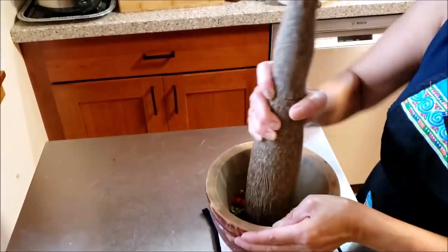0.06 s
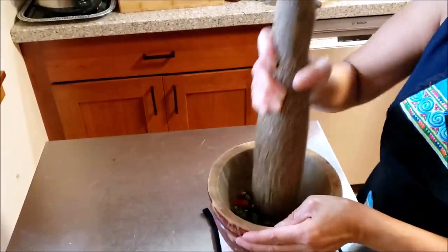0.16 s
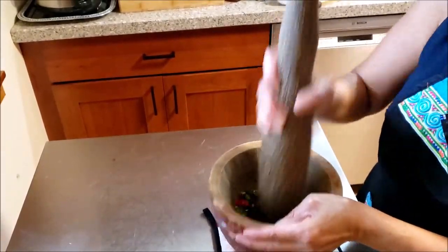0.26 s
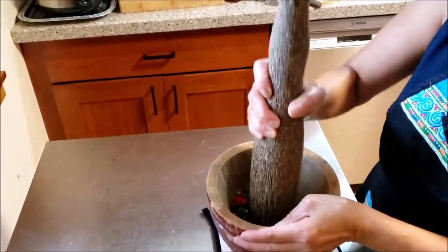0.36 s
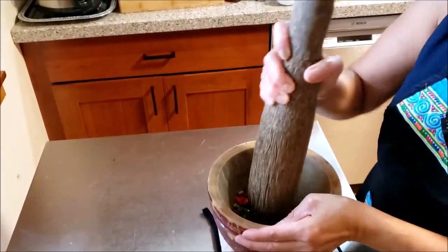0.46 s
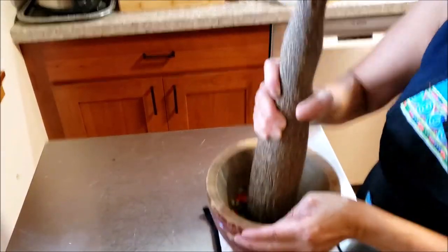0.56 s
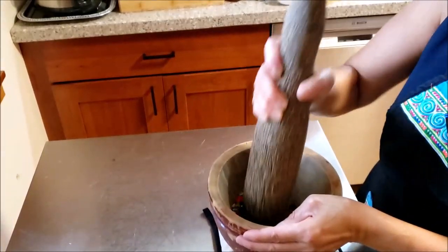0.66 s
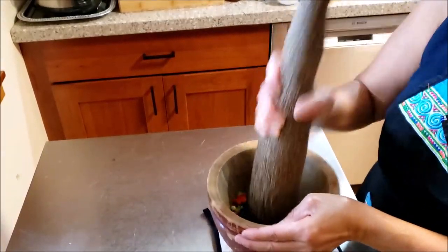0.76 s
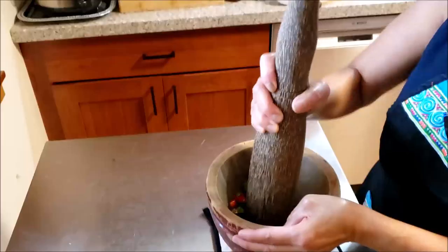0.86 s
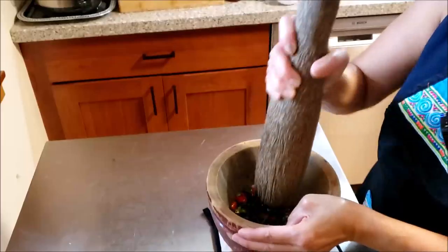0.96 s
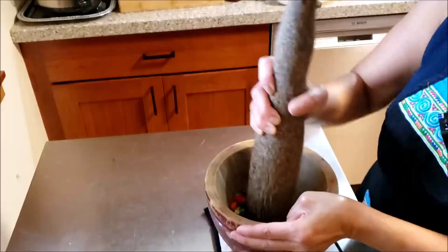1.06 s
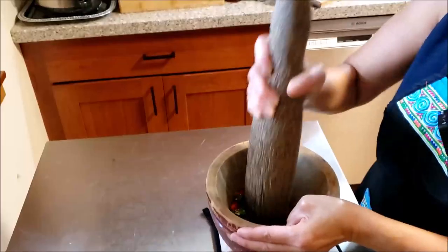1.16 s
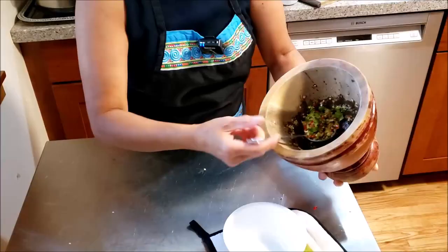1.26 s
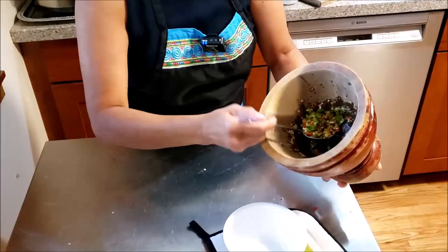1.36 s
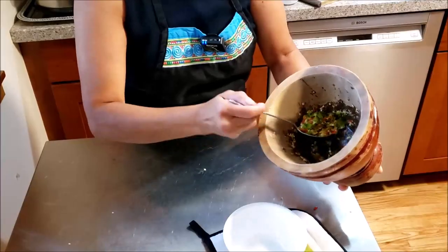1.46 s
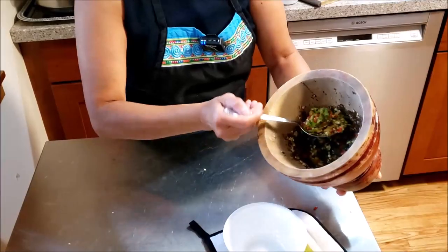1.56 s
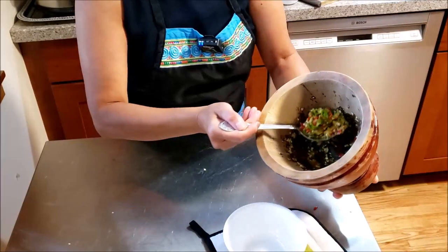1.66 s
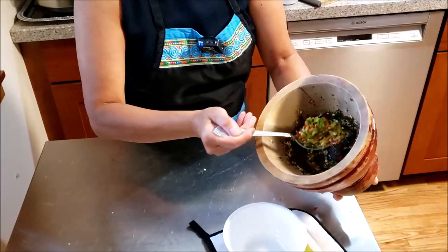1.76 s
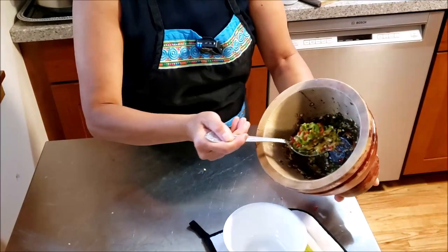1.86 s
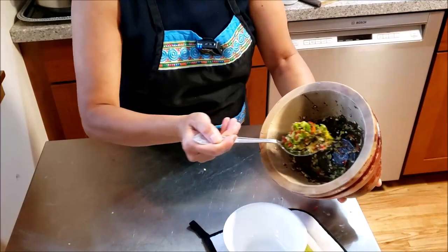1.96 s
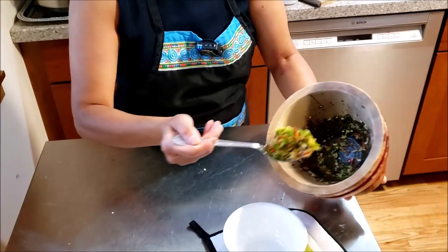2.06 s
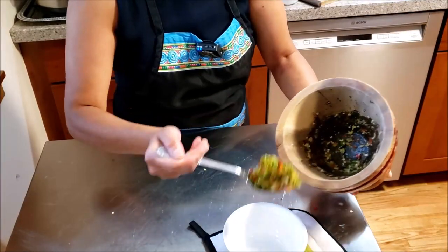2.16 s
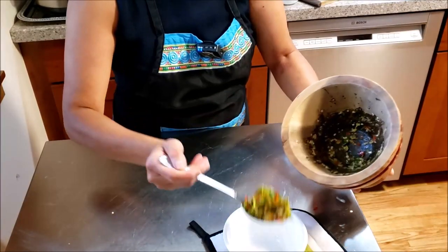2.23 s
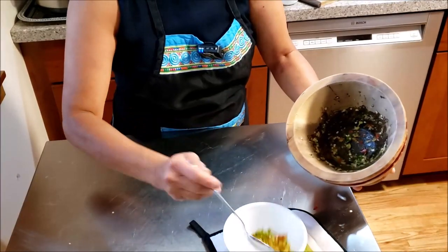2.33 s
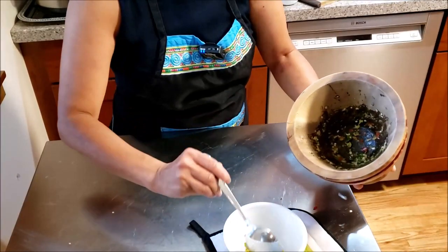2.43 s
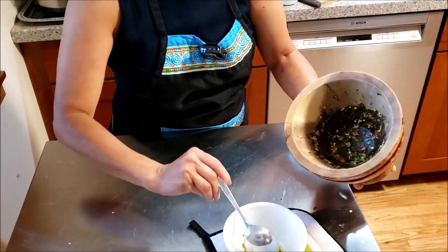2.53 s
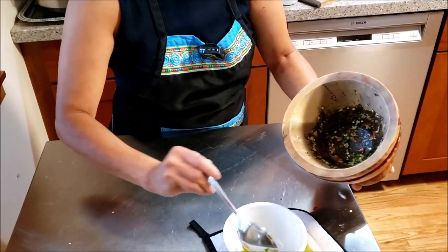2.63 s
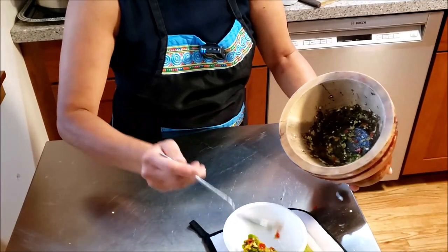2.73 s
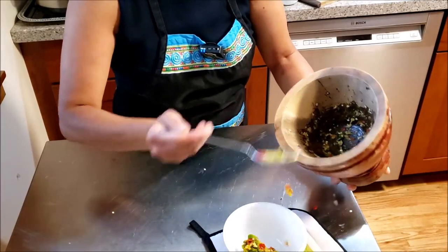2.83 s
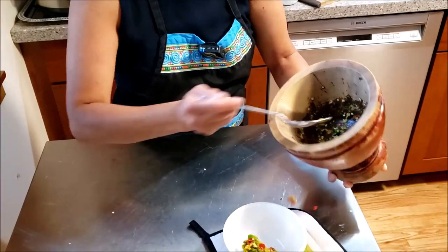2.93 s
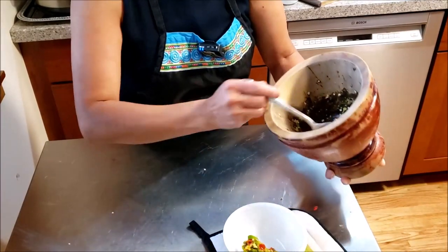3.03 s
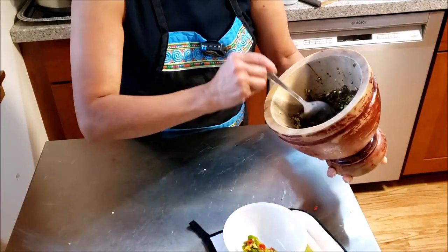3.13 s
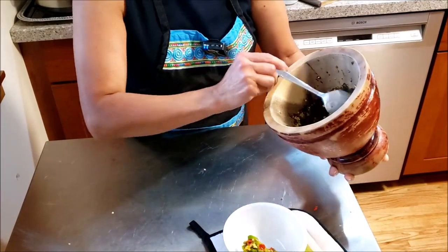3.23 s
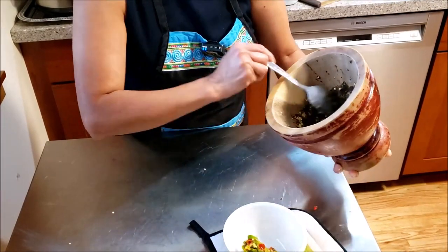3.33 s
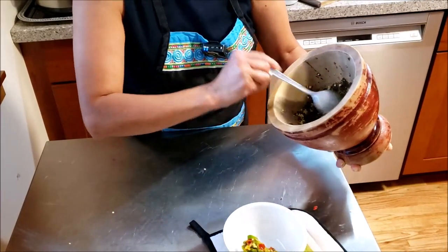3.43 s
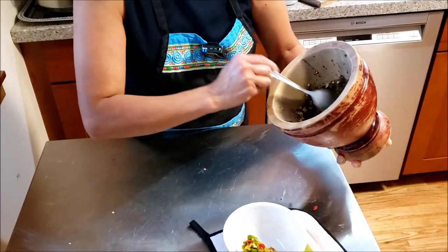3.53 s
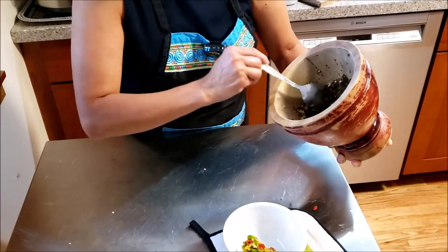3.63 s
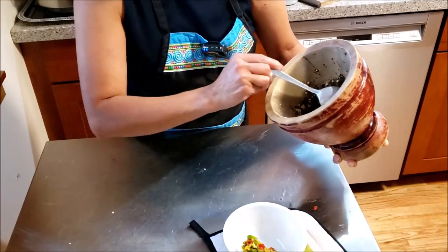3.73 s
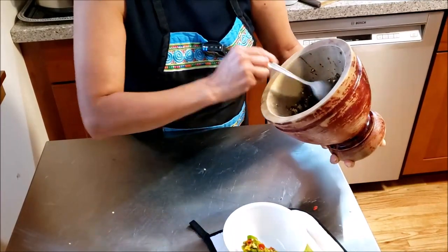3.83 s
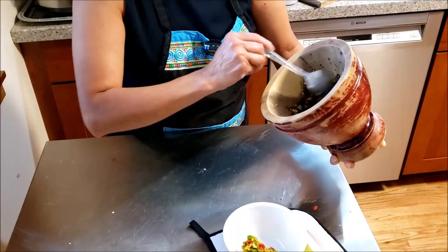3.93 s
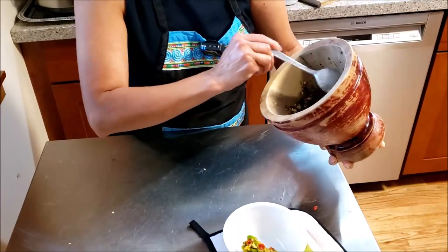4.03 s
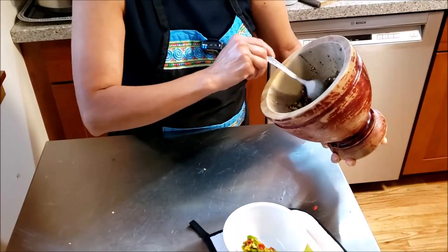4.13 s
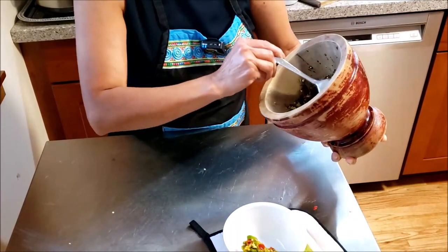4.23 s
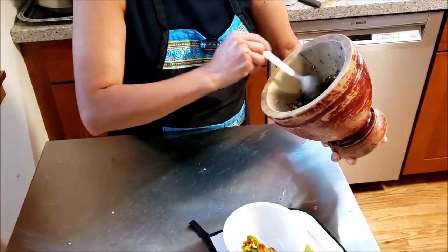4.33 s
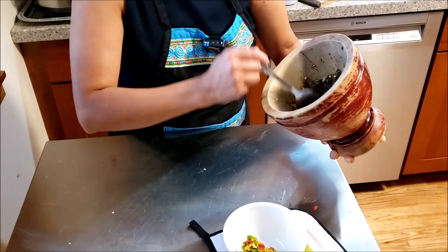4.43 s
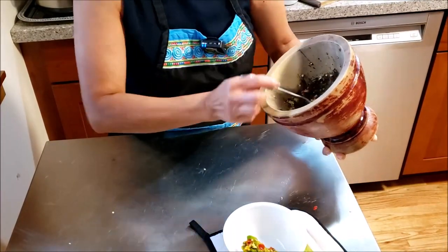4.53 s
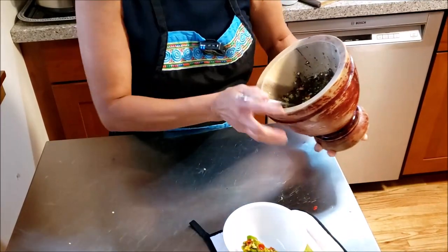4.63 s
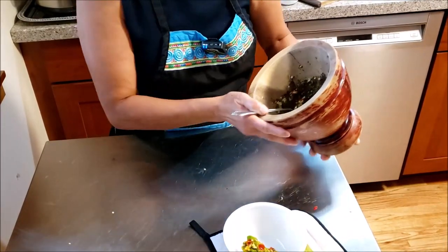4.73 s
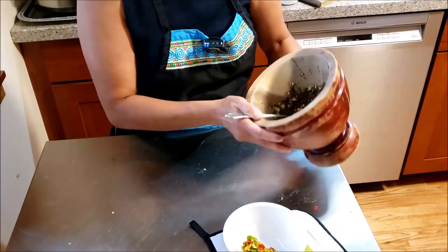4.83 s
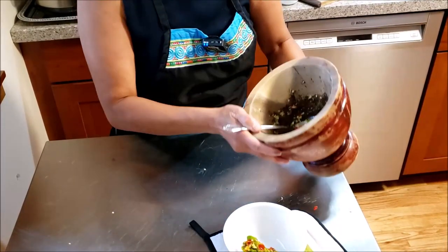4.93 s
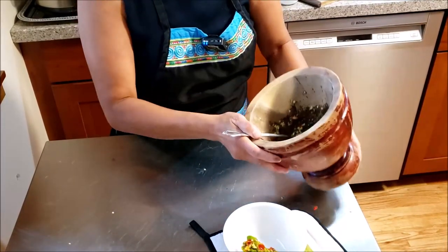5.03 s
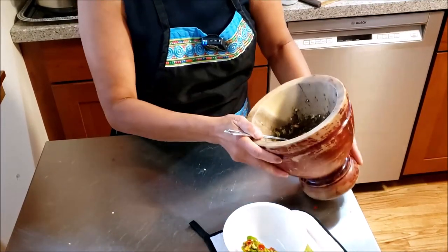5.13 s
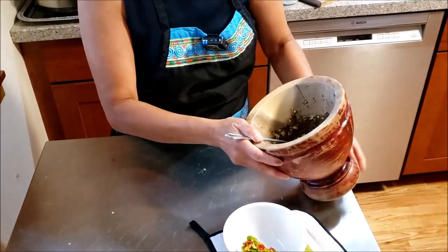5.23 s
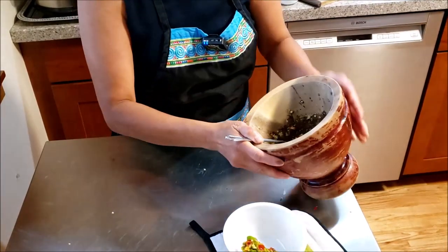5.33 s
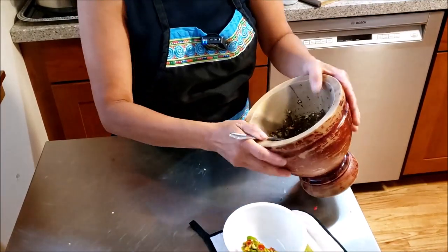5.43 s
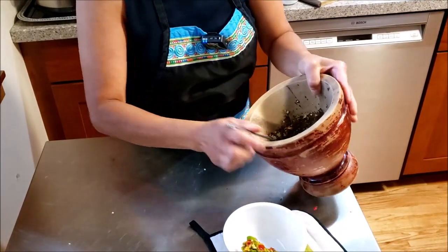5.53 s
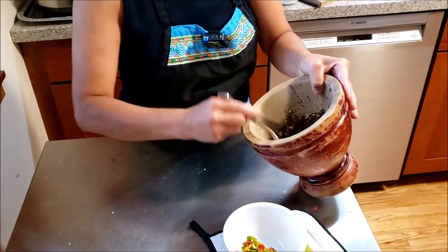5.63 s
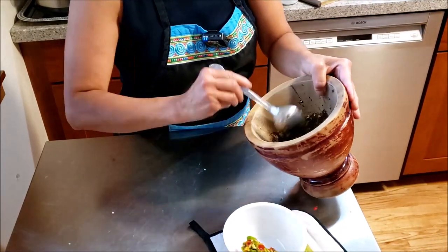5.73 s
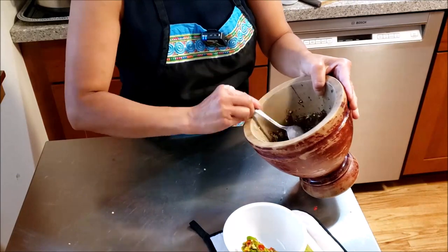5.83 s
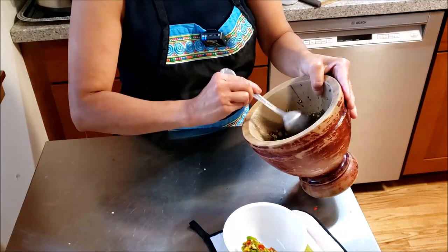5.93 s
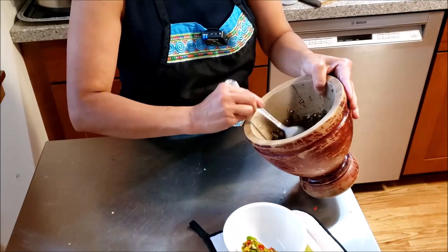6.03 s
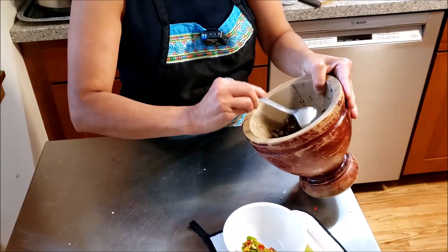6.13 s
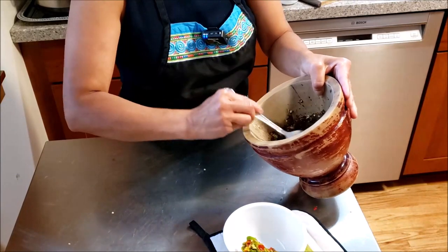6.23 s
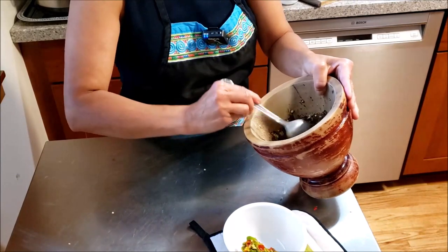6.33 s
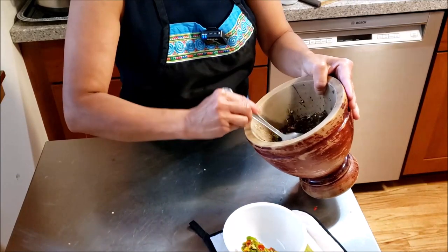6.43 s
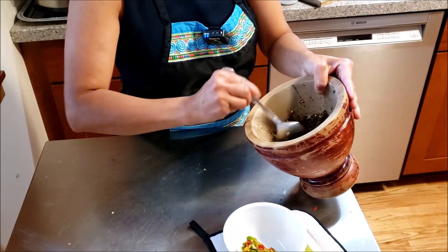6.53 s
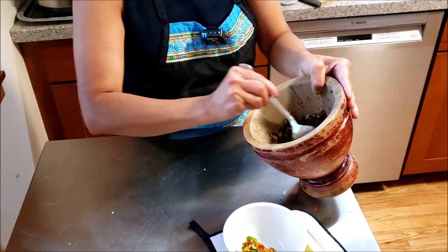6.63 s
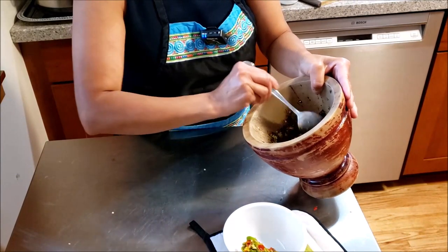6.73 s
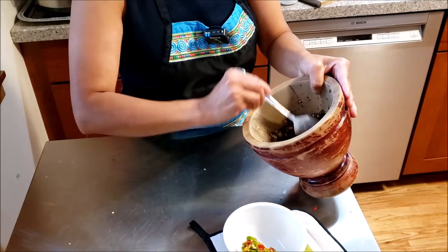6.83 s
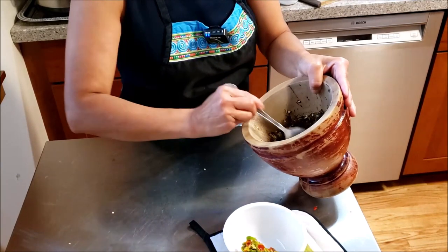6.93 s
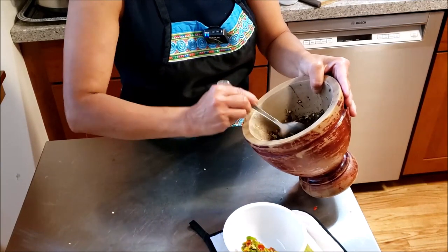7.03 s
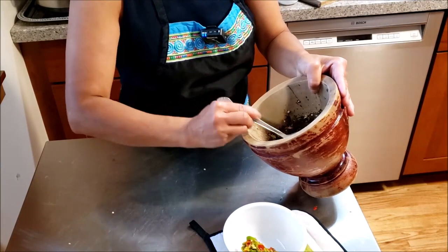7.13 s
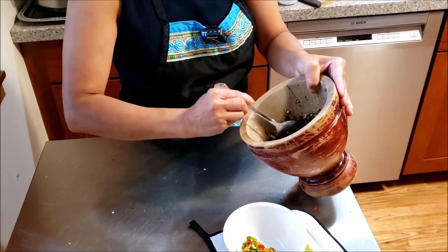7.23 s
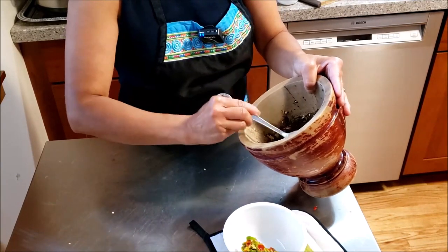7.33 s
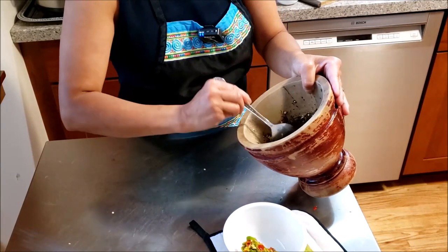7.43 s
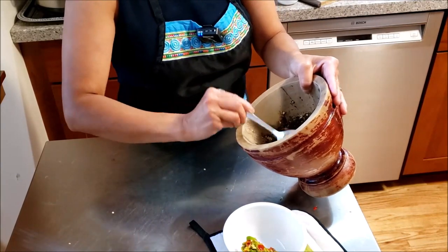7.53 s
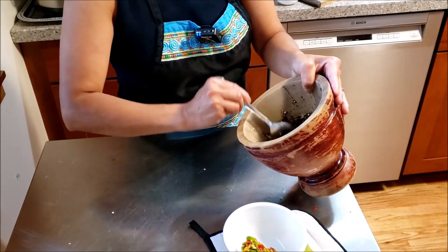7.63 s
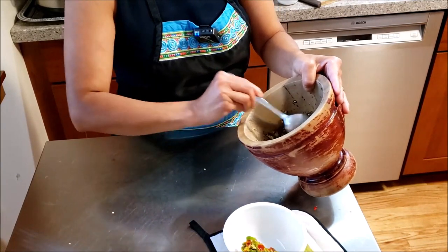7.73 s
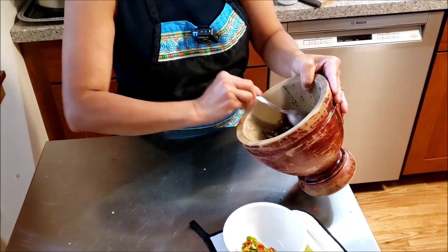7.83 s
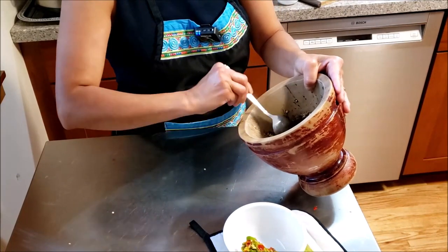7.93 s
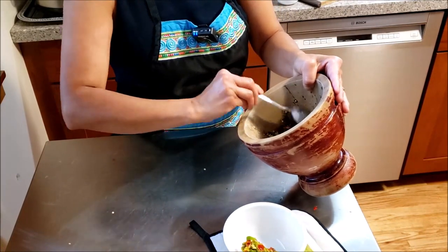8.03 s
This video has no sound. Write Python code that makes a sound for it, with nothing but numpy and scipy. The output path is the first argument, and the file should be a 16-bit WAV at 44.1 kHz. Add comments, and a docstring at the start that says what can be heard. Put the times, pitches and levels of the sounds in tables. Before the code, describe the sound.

A wooden pestle thuds five times into wet chillies, then a metal spoon taps and scrapes inside the clay mortar in a small kitchen.

```python
"""Chillies in a clay mortar

A small kitchen, one microphone near a steel table. A wooden pestle pounds wet chillies in a deep clay
mortar, five blows. The mortar is lifted, scraped out with a metal spoon, set down with a thud and
scraped again: taps on the wall and short drags through the paste. The room rings after every contact,
and the recorder's limiter flattens the hardest ones."""
import sys
import numpy as np
from scipy import signal
from scipy.fft import rfft, irfft, next_fast_len
from scipy.io import wavfile
from scipy.ndimage import uniform_filter1d, minimum_filter1d, map_coordinates

SR = 44100
rng = np.random.default_rng(int(sys.argv[2]) if len(sys.argv) > 2 else 0)


def unload_wav(signal):
    """Save mono or channel-first audio to the path in sys.argv[1] as 16-bit WAV at rate SR, clipped to [-1, 1]."""
    wavfile.write(
        sys.argv[1],
        SR,
        np.round(np.clip(np.atleast_2d(signal).T, -1, 1) * 32767).astype(np.int16),
    )


N = 355887

# the kitchen's decay: (frequency [Hz], t60 before stretching [s])
KITCHEN_DECAY = [(80, 0.55), (250, 0.71), (700, 0.84), (1500, 0.94), (4000, 0.68), (8000, 0.54),
                 (15000, 0.11)]
# spectral shapes: (frequency [Hz], relative level [dB])
WALL_COLOUR = [(60, 5), (300, 3.5), (800, 1), (1500, -2.5), (4000, -5), (8000, 2), (15000, 8.5)]  # what the walls send back to the microphone
ROOM_TONE = [(25, -51), (70, 10), (170, 0), (350, -4.5), (900, -11.5), (2000, -23.5), (7700, -25.5),
             (16000, -37.5)]
HISS_SPECTRUM = [(1500, -19), (4500, -8.5), (7500, -2), (10000, -12.5), (16000, -36)]
SKIN_SPECTRUM = [(300, -16), (2200, -1), (3200, 5.5), (5000, 0.5), (8000, -8), (16000, -22)]
CLOTH_SPECTRUM = [(200, -8.5), (400, 5), (1300, -8.5), (2200, -12.5), (8000, -17), (16000, -42)]
CRUSH_SPECTRUM = [(500, -45), (1200, 8), (2000, 7.5), (4200, 8.5), (6500, 7), (10000, -5), (16000, -14)]  # chillies under the pestle; also the spoon's tick
WASH_SPECTRUM = [(500, -17), (1200, 10.5), (2000, 0.5), (4200, 5), (7500, -4), (10000, -14.5), (16000, -30)]  # the crush, diffused in the room

# resonances: (frequency [Hz], bandwidth [Hz], relative level [dB])
DISH_MODES = [(380, 340, -3), (1060, 160, 5), (4000, 2100, -6.5)]
FOOT_MODES = [(84.6, 20.6, 10), (274, 31, 3.5), (348, 25, -0.5), (427, 54, -3.5), (564, 72, -2.5),
              (725, 33, -6.5), (830, 96, -12.5), (1310, 320, -14.5)]  # the mortar's foot on the table
PASTE_MODES = [(5760, 1100, -7), (7160, 82, 2), (8150, 130, 6.5), (9100, 1500, -10.5), (11400, 350, -0.5),
               (13600, 450, -4), (15200, 700, -9)]  # wet squeak
SPOON_MODES = [(1450, 220, -1), (1810, 116, 0.5), (2200, 194, -9), (2596, 115, -5.5), (3057, 106, -3),
               (3620, 228, -5), (4450, 117, -6), (5010, 235, -5), (6660, 220, -18), (7260, 99, -16),
               (9000, 180, -22), (11900, 510, -49)]
HOLLOW_MODES = [(131, 130, -8), (252.6, 39, -1.5), (345, 61, -3.5), (459, 100, -11.5), (586, 86, -9),
                (705.6, 41.5, -2), (843.5, 43.3, -3), (1154, 540, -19.5)]  # the mortar's cavity
KNOCK_MODES = [(490, 170, -14.5), (612, 26, -7.5), (700, 66, -11), (762, 22, -8), (794, 42, -5.5),
               (964, 210, -15), (1136, 47, -13)]  # its bare bottom
BOOM_MODES = [(246.2, 18.4, 1), (270.5, 14.7, 7.5), (326.5, 38, -4), (427, 214, -6)]  # the table top's ring
THUMP_MODES = [(92.2, 24, -4.5), (124.2, 27, 0.5), (138, 24.6, -0.5)]  # the table's deep swing

# swells of noise: (middle [s], length [s], level [dB])
HAND_RUBS = [(1.57, 0.18, -54.5), (4.85, 0.1, -43.5), (5.15, 0.59, -51.5), (5.54, 0.28, -49)]  # hands on clay
APRON_RUSTLES = [(2.97, 0.4, -47.5)]  # the arm swings back to the mortar
HIGH_HISSES = [(2.97, 0.25, -54), (6.56, 0.47, -43.5)]
# soft low bumps while the mortar is held up: (time [s], relative level [dB])
LOW_BUMPS = [(1.593, -29), (1.643, -31), (1.754, -27.5), (1.782, -32.5), (1.822, -34.5), (1.864, -32.5),
             (1.908, -38.5)]
# the mortar's foot lands and rocks on the table: (time [s], level [dB])
FOOT_CONTACTS = [(5.175, -12.5), (5.183, -19), (5.200, -31), (5.236, -25), (5.258, -24)]
# the spoon drags on the wall: (time [s], length [s], hollow level [dB], steel level [dB], steel centre [Hz])
SPOON_DRAGS = [(3.105, 0.018, -25, -27, 2950), (3.331, 0.063, -24.5, -36.5, 2730),
               (3.597, 0.045, -35, -34.5, 1950), (3.832, 0.072, -25, -37, 2720),
               (4.074, 0.04, -23.5, -31, 3500), (4.31, 0.088, -28, -35, 2570),
               (4.521, 0.031, -38, -37, 2860), (4.723, 0.029, -33, -37, 2120),
               (6.212, 0.12, -31.5, -39, 3180), (6.465, 0.032, -29, -31, 3680),
               (6.713, 0.067, -29.5, -33.5, 3540), (6.978, 0.051, -29, -36, 2640),
               (7.166, 0.077, -29, -38.5, 2730), (7.403, 0.024, -25, -33.5, 2830),
               (7.618, 0.058, -33.5, -38, 2700), (7.882, 0.064, -28.5, -36, 2250)]
# the spoon strikes the wall: (time [s], hollow level [dB], steel level [dB], steel centre [Hz])
SPOON_TAPS = [(3.082, -20, -31, 2400), (3.152, -24, -33.5, 2730), (3.286, -28.5, -42.5, 2850),
              (3.33, -20.5, -28.5, 2830), (3.378, -37.5, -28.5, 2700), (3.528, -22, -25.5, 3050),
              (3.596, -19, -27.5, 2160), (3.794, -31.5, -30.5, 3360), (3.941, -46, -28.5, 2460),
              (4.043, -30.5, -37.5, 2440), (4.145, -28.5, -36, 1970), (4.276, -26, -23.5, 3240),
              (4.391, -52, -28, 2450), (4.544, -51, -47, 4430), (4.72, -28, -27.5, 1900),
              (4.757, -34, -33, 2840), (5.267, -55, -39.5, 2930), (5.466, -35, -21.5, 3440),
              (5.623, -35, -43, 2540), (5.891, -16.5, -15, 2800), (6.047, -17.5, -21.5, 2470),
              (6.205, -35.5, -30, 4000), (6.261, -30.5, -31, 3860), (6.442, -25.5, -24.5, 3240),
              (6.664, -29.5, -26.5, 2200), (6.926, -34, -24.5, 3400), (6.966, -24.5, -66, 2560),
              (7.381, -28, -41, 2880), (7.575, -26.5, -27, 3200), (7.626, -24, -34, 3870),
              (7.845, -21, -32, 2380)]
# the pestle lands: (time [s], weight [dB], relative knock level [dB], delay until the paste gives [s])
PESTLE_BLOWS = [(0.052, -18.5, -14.5, 0.012), (0.315, -24, -18.5, 0.022), (0.587, -12, -22, 0.034),
                (0.853, -11.5, -16.5, 0.025), (1.122, -21.5, -42, 0.015)]

DISH_S, DISH_DB = 2.573, -44.5
HOLLOW_HELD_HZ, HOLLOW_STANDING_HZ = 717, 600  # the hollow answers lower on the table
PASTE_HELD_DB, PASTE_STANDING_DB = -12, -16.5  # relative to the steel; less paste on the second pass
CHATTER_S, CHATTER_S_PER_POWER = 0.0075, 3.42  # shortest t60; a harder tap chatters longer
BOOM_DB, BOOM_GROWS = 2, 1.38  # level at a weight of 0 dB; dB gained per dB of weight
CRUSH_DB, CRUSH_GROWS = -21, 0.44  # soft paste hardly gets louder under a heavier blow
WASH_DB, WASH_T60_S = -2.5, 0.8  # level relative to the crush
POUNDING_END_S, TOP_HZ = 1.318, 15700
SIZE = 16384  # samples in one contact's sound
T = np.arange(SIZE) / SR
HZ = np.fft.rfftfreq(SIZE, 1 / SR)


def amp(db):
    """Decibels to gain."""
    return 10 ** (np.asarray(db) / 20)


def along(points, hz):
    """Interpolate (frequency [Hz], value) points on a log frequency axis."""
    freqs, values = np.transpose(points)
    return np.interp(np.log(hz + 1), np.log(freqs + 1), values)


def level(x, db, seconds=1 / 50):
    """Scale x to the energy of a sound that holds db for so many seconds."""
    return x * amp(db) * np.sqrt(seconds * SR / (np.sum(x ** 2) + 1e-20))


def add(track, s, x):
    """Mix x into the track at time s."""
    part = track[max(round(s * SR), 0):][:len(x)]
    part += x[:len(part)]


def noise(spectrum, size):
    """Coloured noise of rms 1."""
    padded = next_fast_len(size)
    colour = amp(along(spectrum, np.fft.rfftfreq(padded, 1 / SR)))
    x = irfft(rfft(rng.standard_normal(padded)) * colour, padded)[:size]
    return x / np.std(x)


def grains(rate, spread_db):
    """Random slips of uneven size, about rate a second."""
    slips = (rng.random(SIZE) < rate / SR) * rng.standard_normal(SIZE)
    return slips * amp(spread_db * rng.standard_normal(SIZE))


def swells(rows):
    """A gain with one bell-shaped swell per row."""
    t = np.arange(N) / SR
    return sum(amp(db) * np.exp(-(2 * (t - s) / length) ** 2) for s, length, db in rows)


def contact(t60, rattle):
    """One sharp push and a dying chatter, flattened to drive all frequencies about evenly."""
    chatter = grains(8000, 0.35) * amp(-60 * T / t60)
    spectrum = rfft((T == 0) + rattle * chatter / (np.linalg.norm(chatter) + 1e-9))
    power = uniform_filter1d(np.abs(spectrum) ** 2, size=161)
    return irfft(spectrum / np.sqrt(np.abs(power) + 1e-9))


def resonate(force, modes, hard_hz, centre_hz=None, octaves=1.0, scatter_db=3.0):
    """A force rings the modes, dulled above hard_hz; the place of contact favours centre_hz."""
    hz, width, db = np.transpose(modes)[:, :, None]
    polarity = (-1) ** np.arange(len(modes))[:, None]
    gain = polarity * amp(db + scatter_db * rng.standard_normal(db.shape))
    if centre_hz:
        gain = gain * (0.14 + 1 / (1 + (np.log2(hz / centre_hz) / octaves) ** 2))
    response = np.sum(gain * 1j * HZ * width / (hz ** 2 - HZ ** 2 + 1j * HZ * width), axis=0)
    ring = irfft(rfft(force) * response / (1 + 1j * HZ / hard_hz) ** 2)
    return ring * (1 - T / T[-1])


def kitchen(x, wet_db, stretch=0.55):
    """The microphone hears the direct sound, then a diffuse tail off the walls, drawn anew each call."""
    hz, t, bands = signal.stft(rng.standard_normal(SR * 3 // 5), SR, nperseg=256)
    decay = amp(-60 * t / (stretch * along(KITCHEN_DECAY, hz))[:, None])
    tail = signal.istft(bands * decay * amp(along(WALL_COLOUR, hz))[:, None], SR, nperseg=256)[1]
    tail *= 1 - np.exp(-(np.arange(len(tail)) / SR / 0.0041) ** 2)  # reflections build up
    response = amp(wet_db) * tail / np.sqrt(SR * np.mean(np.sum(decay ** 2, axis=1)) * t[1])
    response[0] += 1  # direct path
    return signal.fftconvolve(x, response)


def background():
    """Room tone, with uneven rubbing of hands and apron and a soft high hiss that comes and goes."""
    unrest = map_coordinates(rng.standard_normal(400), [np.arange(N) / SR * 40])
    hands = swells(HAND_RUBS) * noise(SKIN_SPECTRUM, N)
    apron = swells(APRON_RUSTLES) * noise(CLOTH_SPECTRUM, N)
    hiss = swells(HIGH_HISSES) * noise(HISS_SPECTRUM, N)
    return amp(2.8 * unrest) * (hands + apron) + hiss + amp(-53.5) * noise(ROOM_TONE, N)


def bumps():
    """Each low bump is a few slow swings under a soft swell, with a weak overtone."""
    out = np.zeros(N)
    phase = 2 * np.pi * 110 * T
    swing = (np.sin(phase) + 0.12 * np.sin(2 * phase)) * np.exp(-((T - .015) / 0.0067) ** 2)
    for s, db in LOW_BUMPS:
        add(out, s, level(swing, db + 2.5))
    return kitchen(out, wet_db=-6.5)[:N]


def spoonful():
    """The loaded spoon gives a dish one dull knock; it sounds off-mic, with plenty of room."""
    out = np.zeros(N)
    knock = level(resonate(contact(0.02, 1.0), DISH_MODES, hard_hz=5000), DISH_DB)
    add(out, DISH_S, kitchen(knock, wet_db=0.0, stretch=0.7))
    return out


def landing():
    """The mortar's heavy foot meets the table dully and rattles to rest."""
    out = np.zeros(N)
    for s, db in FOOT_CONTACTS:
        add(out, s, level(resonate(contact(0.071, 0.75), FOOT_MODES, hard_hz=1900), db))
    return kitchen(out, wet_db=-3.5)[:N]


def standing(s):
    """Whether the mortar is back on the table at time s."""
    return s > FOOT_CONTACTS[0][0]


def mortar(force, s):
    """The hollow rings; once the mortar stands on the table, the table top hums along."""
    centre_hz = HOLLOW_STANDING_HZ if standing(s) else HOLLOW_HELD_HZ
    hollow = level(resonate(force, HOLLOW_MODES, 1830, centre_hz, octaves=0.86), 0)
    thump = level(resonate(force, THUMP_MODES, hard_hz=300, centre_hz=91, octaves=0.34), -12)
    boom = level(resonate(force, BOOM_MODES, hard_hz=600), -16.5)
    return hollow + standing(s) * (thump + boom)


def scrapes():
    """The spoon's edge sticks and slips over rough clay and squeezes the wet paste."""
    out = np.zeros(N)
    for s, length, hollow_db, steel_db, steel_hz in SPOON_DRAGS:
        paste_db = steel_db + (PASTE_STANDING_DB if standing(s) else PASTE_HELD_DB)
        stroke = np.clip(T / 0.0058, 0, 1) * amp(-60 * np.maximum(T - length, 0) / 0.071)
        catches = np.sign(grains(160, 0))  # single ticks where the edge catches on grit
        slips = stroke * (catches + 0.16 * grains(2500, 1.2))
        hollow = level(mortar(slips, s), hollow_db, length)
        ring = resonate(slips, SPOON_MODES, 12000, steel_hz, octaves=0.39, scatter_db=4)
        steel = level(ring, steel_db, length)
        paste = level(resonate(stroke * grains(3600, 9.7), PASTE_MODES, TOP_HZ), paste_db, length)
        add(out, s, kitchen(hollow + steel + paste, wet_db=-10.0))
    return out


def taps():
    """Steel on clay: a tick, the held spoon rings for a moment and the mortar's hollow answers."""
    out = np.zeros(N)
    for s, hollow_db, steel_db, steel_hz in SPOON_TAPS:
        t60 = CHATTER_S + CHATTER_S_PER_POWER * (amp(hollow_db) ** 2 + amp(steel_db) ** 2)
        force = contact(t60, rattle=0.51 + 16 * t60)
        hard_hz = 16000 / (1 + t60 / 0.057)  # a spoon that digs in is duller than a glancing one
        hollow = level(mortar(force, s), hollow_db)
        ring = resonate(force, SPOON_MODES, hard_hz, steel_hz, octaves=0.26, scatter_db=2.5)
        tick = level(noise(CRUSH_SPECTRUM, SIZE) * np.exp(-T / 0.0043), max(steel_db, hollow_db) - 20.5)
        add(out, s, kitchen(hollow + level(ring, steel_db) + tick, wet_db=-7.5))
    return out


def chillies(db, give_s):
    """Seedy paste cracks under the pestle, gives way with a squelch and leaves a wash in the room."""
    crack = (1 - np.exp(-T / 0.0012)) * amp(-60 * T / 0.036)
    squelch = 0.23 * np.exp(-((T - give_s) / 0.0065) ** 2)
    tail = 0.042 * amp(-60 * T / 0.074)
    seeds = 1 + 1.5 * np.abs(grains(2500, 4))
    crush = noise(CRUSH_SPECTRUM, SIZE) * (crack + squelch + tail) * seeds
    crush = signal.sosfilt(signal.butter(2, 11500, fs=SR, output="sos"), crush)
    wash = noise(WASH_SPECTRUM, SIZE) * amp(-60 * T / WASH_T60_S)
    return level(crush, db) + level(wash, db + WASH_DB)


def pounding():
    """The pestle crushes the paste and knocks the mortar's bottom; the table swings after it."""
    out = np.zeros(N)
    for s, weight_db, knock_db, give_s in PESTLE_BLOWS:
        boom_db = BOOM_DB + BOOM_GROWS * weight_db
        add(out, s - .001, chillies(CRUSH_DB + CRUSH_GROWS * weight_db, give_s))
        knock = level(resonate(contact(0.031, 0.56), KNOCK_MODES, hard_hz=2200), knock_db - 3.5)
        add(out, s, kitchen(knock, wet_db=-5.5))
        boom = level(resonate(contact(0.044, 0.75), BOOM_MODES, hard_hz=890), boom_db)
        add(out, s + 0.00294, kitchen(boom, wet_db=-7.5, stretch=0.91))
        thump = level(resonate(contact(0.012, 0.99), THUMP_MODES, hard_hz=520), weight_db)
        add(out, s + 0.0073, kitchen(thump, wet_db=-12.0))
    # the last blow's ring stops short
    return out * np.clip((POUNDING_END_S - np.arange(N) / SR) / 0.0047, 0, 1)


def scene():
    """The kitchen in mono, from one microphone position."""
    return (pounding() + landing() + taps() + scrapes() + spoonful() + bumps() + background())[None]


def record(dry):
    """A fast limiter holds the peaks; the small microphone loses the deep bass and the very top."""
    ceiling = amp(-5)
    needed_gain = np.minimum(1, ceiling / (np.abs(dry) + 1e-9))
    gain = uniform_filter1d(minimum_filter1d(needed_gain, size=181), size=121)
    low_cut = signal.butter(2, 40, "highpass", fs=SR, output="sos")
    high_cut = signal.ellip(8, .5, 80, TOP_HZ, fs=SR, output="sos")
    return signal.sosfilt(high_cut, signal.sosfilt(low_cut, dry * gain))


dry = scene()
out = record(dry)
unload_wav(out)
```